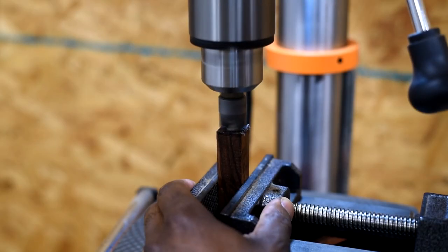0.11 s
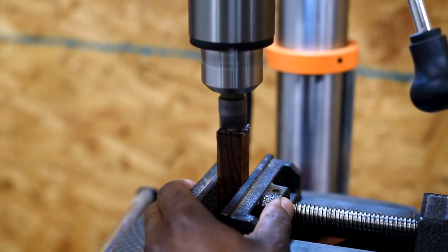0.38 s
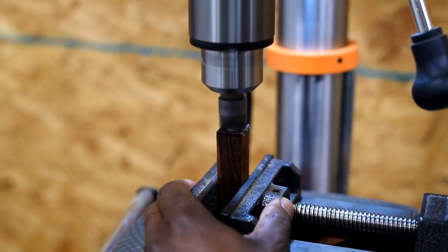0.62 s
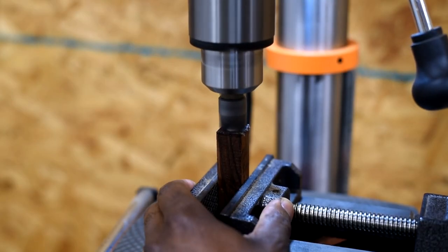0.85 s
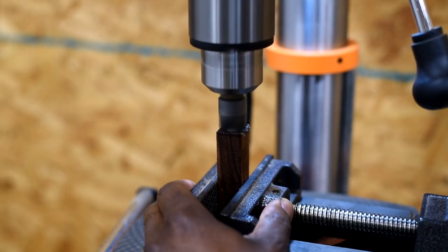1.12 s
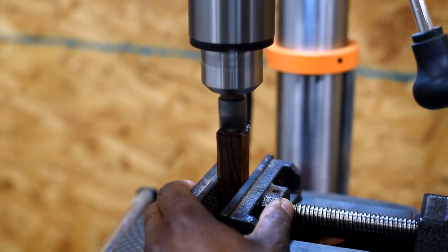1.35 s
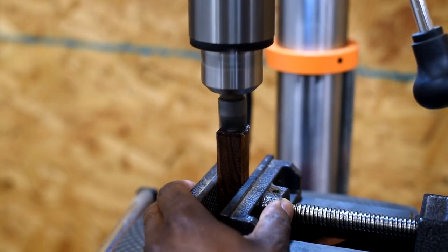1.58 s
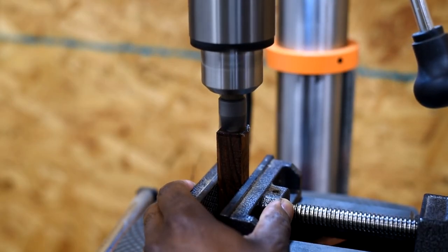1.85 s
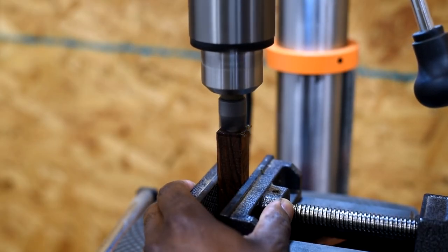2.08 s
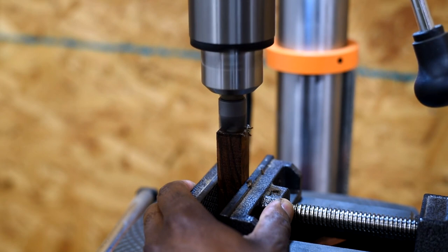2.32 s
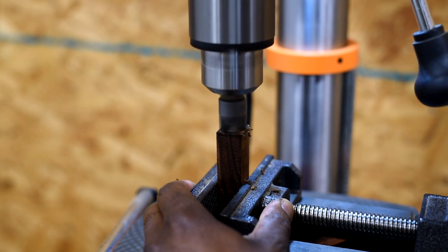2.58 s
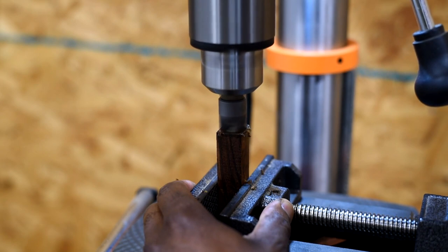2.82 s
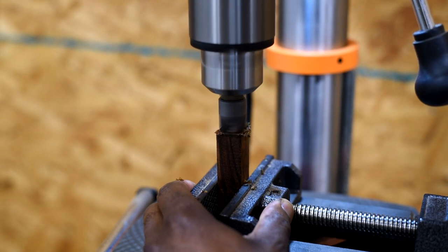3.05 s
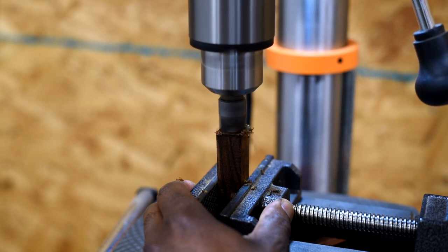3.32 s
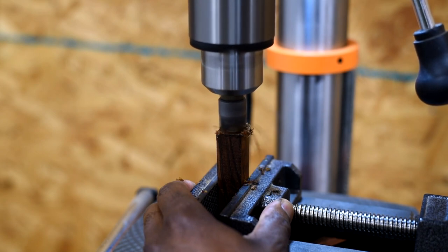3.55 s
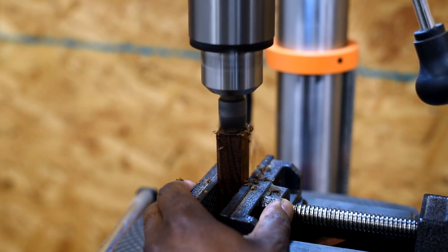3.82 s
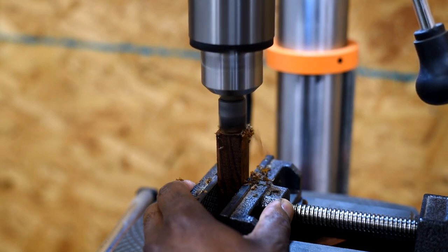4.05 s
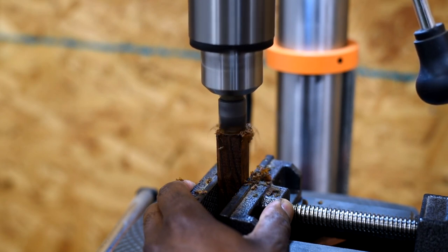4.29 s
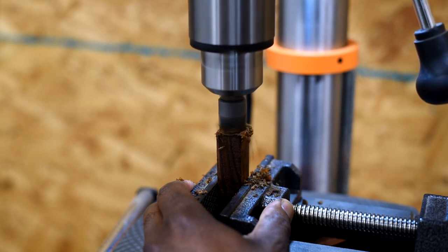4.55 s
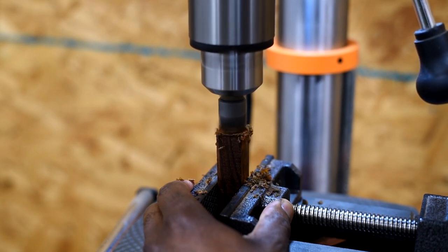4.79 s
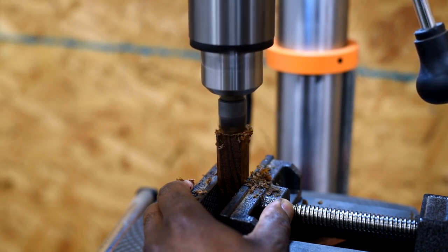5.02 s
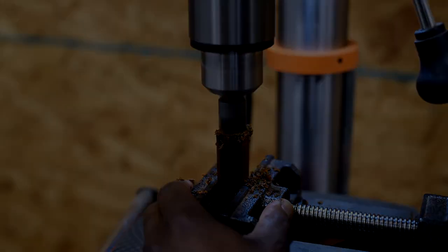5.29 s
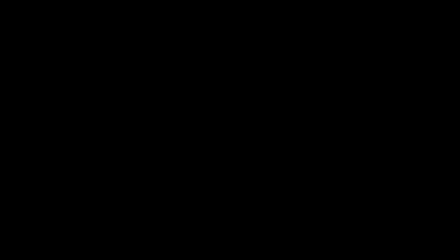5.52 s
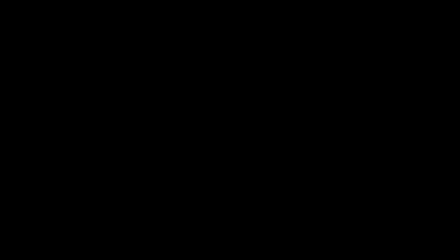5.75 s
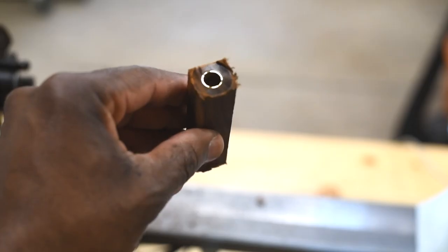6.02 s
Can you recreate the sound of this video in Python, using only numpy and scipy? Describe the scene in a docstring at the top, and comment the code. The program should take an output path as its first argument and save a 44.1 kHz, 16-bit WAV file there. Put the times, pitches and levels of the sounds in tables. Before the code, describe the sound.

Steady motor hum and gear-like whine, with rhythmic wood scraping and steel hiss building as a drill bores deeper, fading out before a quiet workshop.

```python
"""Workshop: a benchtop drill press turns a four-edged cutter into the end of a wooden blank held in a vice.
Sine tones make the hum and whine of the induction motor, the spindle and the column.
Noise shaped by resonances makes head rumble, belt hiss, scrape, steel ring and dust, the cutting pulsed by each edge.
Fibres snag and the quill knocks. The press fades out; after a silence the quiet workshop is heard."""
import sys
import numpy as np
from scipy import signal
from scipy.fft import rfft, irfft, next_fast_len
from scipy.io import wavfile

SR = 44100
rng = np.random.default_rng(int(sys.argv[2]) if len(sys.argv) > 2 else 0)


def boost_factor(decibels):
    """Convert a level in decibels to a linear amplitude factor."""
    exponent = np.asarray(decibels, float) / 20
    return 10 ** exponent


def put_to_file(sound):
    """Save the sound as 16-bit audio at rate SR, in the file named by the first command-line argument."""
    columns = np.atleast_2d(sound).T  # one column per channel
    safe = np.clip(columns, -1, 1)
    whole_steps = np.round(safe * 32767)
    wavfile.write(sys.argv[1], SR, whole_steps.astype(np.int16))


N = 270553
HUM_HZ = 120   # twice the mains frequency

# resonances of head and column: mode_hz, width_hz, gain_db
CASTING = [(177.4, 22, 1), (361, 56, 4.5), (382, 11, 4), (465.8, 21.4, 10), (494, 22, 3.5), (552.6, 30, 8),
           (1154, 58, 9), (1450, 31, 0.5), (1624, 50, 8), (1743, 18, 13.5), (1830, 36, 2.5),
           (1810, 50, -1.5), (1933, 59, 11.5)]
# dips between the casting resonances: dip_hz, width_hz, gain_db
HOLLOWS = [(205, 14, -5), (257, 17, -9), (407, 35, -2), (802, 26, -3), (980, 52, -2.5), (1055, 18, -1),
           (1550, 31, -2.5), (1645, 23, -8), (1893, 46, -7.5)]
# spectrum of the wood scrape: freq_hz, relative_db (per Hz)
SCRAPE = [(710, -40.5), (1200, -2.5), (1410, -7.5), (1770, 1.5), (2190, -10), (3880, 0.5), (5850, -14.5),
          (6500, -10.5), (8450, -42), (14300, -120)]
# resonances of blank and vice: mode_hz, width_hz, gain_db
BLANK = [(2807, 120, -2.5), (3690, 150, -1.5), (3970, 80, -6), (4540, 140, 1)]
# spectrum of chips and dust: freq_hz, relative_db (per Hz)
DUST = [(3500, -26.5), (5500, 2.5), (9000, -14.5), (10000, 1.5), (12900, -2.5), (14000, -8.5), (17000, -10)]


def in_time(rows):
    """Columns of a curve table, one value a sample."""
    s, *columns = np.transpose(rows)
    return [np.interp(np.arange(N) / SR, s, c) for c in columns]


def ramp(from_s, to_s):
    """0 before, 1 after, straight between."""
    return np.clip((np.arange(N) / SR - from_s) / (to_s - from_s), 0, 1)


def between(idle, loaded, load, power=1):
    """A level that moves from its idle to its loaded value."""
    return idle + (loaded - idle) * load ** power


def rms_one(x):
    """Scale to unit rms."""
    return x / np.sqrt(np.mean(x ** 2) + 1e-20)


def drift(rate_hz):
    """Slow chance of spread 1: noise twice through a one-pole low-pass, at 1/40 of the sample rate."""
    r = np.exp(-2 * np.pi * rate_hz * 40 / SR)
    noise = rng.standard_normal(N // 40 + 2002)
    slow = signal.lfilter([1], [1, -2 * r, r * r], noise)[2000:]   # settled part
    return np.interp(np.arange(N) / 40, np.arange(len(slow)), rms_one(slow))


def colour(x, spectrum, modes=()):
    """Shape by a smooth spectrum with resonances or dips on it; rms 1."""
    size = next_fast_len(N)
    hz = np.arange(size // 2 + 1) * SR / size + 1e-3
    point_hz, point_db = np.transpose(spectrum)
    gain = boost_factor(np.interp(np.log(hz), np.log(point_hz), point_db, left=-90, right=-90))
    for mode_hz, width_hz, db in modes:
        gain = gain * (1 + (boost_factor(db) - 1) / (1 + (2 * (hz - mode_hz) / width_hz) ** 2))
    return rms_one(irfft(rfft(x, size) * gain, size)[:N])


def tone(cycles, db, waver_db, rate_hz):
    """A sine of the given rms level whose strength wavers."""
    level = np.sqrt(2) * boost_factor(db + waver_db * drift(rate_hz))
    return level * np.sin(2 * np.pi * (cycles + rng.random()))


def motor(rotor_turns, whine_db):
    """Magnetic hum, rotor bars passing the stator slots, and the cooling fan's blade rate."""
    # mains hum: multiple (of HUM_HZ), level_db (rms)
    hum_table = [(2, -51.5), (3, -40.5), (4, -45.5), (5, -48.5), (6, -50.5), (8, -53), (9, -52)]
    # slot whine family: hum_multiple (added to the slot rate), level_db (against the main whine)
    slot_table = [(-3, -16), (-2, -15.5), (-1, -15), (0, -17.5), (1, 1.5), (3, -23.5), (4, -17),
                  (4.17, -18.5)]
    rotor_bars = 34
    hum = HUM_HZ * np.arange(N) / SR
    out = sum(tone(k * hum, db, waver_db=1.0, rate_hz=0.65) for k, db in hum_table)
    for k, db in slot_table:
        waver_db = 1.63 + 0.27 * abs(k - 1)
        out += tone(rotor_bars * rotor_turns + k * hum, whine_db + db, waver_db, rate_hz=14.0)
    return out + tone(11.97 * rotor_turns, -43, waver_db=2.5, rate_hz=1.5)   # fan


def spindle_whine(turns, load):
    """A gear-like tone whose speed wobbles once a turn, so higher harmonics spread more."""
    # whine harmonics: harmonic, level_db, load_gain_db (under full load)
    harmonics = [(1, -0.5, 0.5), (2, -9, -8.5), (3, -8.5, -2.5), (5, -25, -1)]
    whine_per_turn = 68.25
    whine_db = between(-39.5, -29.5, load, power=0.45)
    wobble = 0.064 * np.sin(2 * np.pi * turns) + 0.014 * drift(4.6)
    cycles = whine_per_turn * turns + wobble
    return sum(tone(k * cycles, whine_db + db + load_db * load, waver_db=1.46 * min(k, 2), rate_hz=6.3)
               for k, db, load_db in harmonics)


def rumble():
    """Belt and bearings shake the resonant casting: noise of wavering strength."""
    # rumble spectrum: freq_hz, relative_db (per Hz)
    spectrum = [(18, -49.5), (30, -27), (45, -24.5), (60, -24.5), (90, -19.5), (125, -11), (200, -12),
                (265, -10.5), (330, -6.5), (415, -11.5), (560, -6.5), (660, -9), (800, -12), (1000, -15.5),
                (1300, -15.5), (2200, -21.5), (2900, -44.5)]
    shake = rng.standard_normal(N) * boost_factor(1.2 * drift(12.0))
    return boost_factor(-29) * colour(shake, spectrum, CASTING + HOLLOWS)


def whirr():
    """Belt and fan hiss, coloured by the resonances of the belt guard."""
    # hiss spectrum: freq_hz, relative_db (per Hz)
    spectrum = [(900, -37), (1500, -8.5), (1900, -7.5), (2450, -8.5), (2890, -4), (3220, -12),
                (4320, -12.5), (5000, -9.5), (6700, -20), (8500, -10.5), (14000, -19.5), (17000, -24.5)]
    # belt guard resonances: mode_hz, width_hz, gain_db
    guard = [(2845, 89, 3.5), (3350, 130, 1), (4370, 120, 4.5), (7150, 200, 4.5)]
    level_db = -34.5 + 1.6 * drift(10.5)
    return boost_factor(level_db) * colour(rng.standard_normal(N), spectrum, guard + HOLLOWS)


def column_tones(turns, load):
    """Spindle orders and hum sidebands beat in the column."""
    # weaker tones: spindle_multiple, hum_multiple, level_db (rms)
    throb_table = [(5.8, 0, -62), (6.7, 0, -61), (3.003, 1, -50.5), (20.1, 0, -63), (21.96, 0, -54.5)]
    # strongest tones: spindle_multiple, hum_multiple
    sway_table = [(8, 0), (12, 0), (-1, 1), (0, 1), (1, 1), (16, 0)]
    # level of each strongest tone: idle_db, loaded_db, swell_middle_s, swell_half_length_s, swell_gain_db
    sway_levels = [(-64, -51, 1.75, .3, 11), (-62, -53.5, 2.25, 0.38, 13.5), (-53.5, -50, 4.8, .5, 2),
                   (-43, -50.5, 1.8, .6, 5), (-43.5, -35.5, 1.07, .5, 7.5), (-54, -47, 2.1, .9, 12.5)]
    s = np.arange(N) / SR
    hum = HUM_HZ * s
    out = sum(tone(k * turns + m * hum, db, waver_db=6.5, rate_hz=2.7) for k, m, db in throb_table)
    for (k, m), (idle_db, loaded_db, middle_s, half_s, gain_db) in zip(sway_table, sway_levels):
        swell_db = gain_db * np.exp(-((s - middle_s) / half_s) ** 2)
        db = between(idle_db, loaded_db, load, power=0.53) + swell_db
        out += tone(k * turns + m * hum, db, waver_db=1.8, rate_hz=6.8)
    return out


def bites(turns, load, uneven):
    """Level swing (dB) as four uneven edges bite once each per turn."""
    # bite of each cutting edge at full unevenness: bite_db
    edges_db = np.array([2, -6.5, 4, -2])
    # edge 2, opposite edge 0, bites harder deep in the hole
    opposite_db = between(-8, 4, ramp(3.6, 4.1))
    # bites come early in the turn until the cutter is seated
    turns = turns + 0.22 * (1 - ramp(1.4, 1.7))
    passes = 4 * turns + .5
    edge = np.floor(passes).astype(int)
    chance_db = 1.0 * rng.standard_normal(256)[edge % 256]
    edge_db = edges_db[edge % 4] + opposite_db * (edge % 4 == 2)
    # rise and fall inside one bite, longer under load
    half_passes = .27 + 0.14 * load ** 2
    swell = np.exp(-((passes - edge - .5) / half_passes) ** 2)
    runout_db = 4.4 * np.cos(2 * np.pi * turns)   # the cutter runs slightly off centre
    return np.clip(uneven, 0, 2) * (swell * (10.5 + edge_db + chance_db) + runout_db)


def grains():
    """Noise whose samples vary widely in strength, as torn grains do."""
    return boost_factor(2.5 * np.minimum(rng.exponential(1, N), 5)) * rng.standard_normal(N)


def chatter(modes, bite_db):
    """Stick-slip makes single modes squeak in short bursts that wander in pitch; rms 1."""
    out = np.zeros(N)
    for hz, width_hz, db in modes:
        cycles = np.cumsum(hz + .7 * width_hz * drift(30.0)) / SR
        burst_db = 13.0 * np.tanh(0.64 * drift(55.0) - .4)
        out += tone(cycles, db + bite_db + burst_db, waver_db=0.5, rate_hz=1)
    return rms_one(out)


def wood_scrape(bite_db, load):
    """Edges tear wood fibres, and the grains ring in blank and vice."""
    level_db = between(-39.5, -31, load, power=0.54)
    pulsed = grains() * boost_factor(0.32 * bite_db + 1.6 * drift(18.0))
    scrape = colour(pulsed, SCRAPE, BLANK + HOLLOWS)
    return boost_factor(level_db) * (scrape + boost_factor(-7) * chatter(BLANK[:-1], 0.3 * bite_db))


def steel_ring(bite_db, ring_db):
    """Steel rubbing in the hole rings the cutter's own modes."""
    # ring spectrum: freq_hz, relative_db (per Hz)
    spectrum = [(5000, -37), (5900, -24), (6300, -9.5), (7100, 2), (8300, -4), (8900, -1.5), (9600, -5),
                (10500, -17.5), (12000, -39.5)]
    # cutter resonances: mode_hz, width_hz, gain_db
    cutter = [(6590, 80, 2.8), (7030, 470, 3.5), (7800, 290, 5), (8610, 230, 5.7), (9200, 99, 2.3),
              (10250, 210, 1.1)]
    pulsed = grains() * boost_factor(bite_db + .6 * drift(8.0))
    return boost_factor(ring_db) * (colour(pulsed, spectrum, cutter) + boost_factor(-4) * chatter(cutter[:-1], bite_db))


def dust_hiss(bite_db, ring_db, load):
    """Chips and dust hiss, following part of the ring's swing and the load."""
    level_db = -43 + 0.67 * (ring_db + 37.5) + 4 * load
    pulsed = grains() * boost_factor(0.43 * bite_db + 1.4 * drift(22.0))
    return boost_factor(level_db) * colour(pulsed, DUST)


def snags():
    """Fibres catch and tear: scrape and dust noise with a sudden start and a short decay."""
    # catches: start_s, level_db (before the 13 dB cut)
    catches = [(0.2894, -13.5), (0.9956, -21.5), (1.0894, -16.5), (1.2027, -19.5), (1.3494, -20),
               (1.8148, -16.5), (1.9344, -17), (1.9894, -17.5), (2.2394, -17), (2.3241, -15),
               (2.4438, -13.5), (2.7955, -18), (2.9981, -16), (3.6854, -15.5), (3.923, -14),
               (4.2792, -13.5), (4.3094, -13.5), (4.5774, -16.5), (4.9811, -15)]
    start_s, level_db = np.transpose(catches)
    decay_s = 0.021
    clicks = np.full(N, 1e-18)
    clicks[np.round(start_s * SR).astype(int)] = boost_factor(level_db - 13.0)
    envelope = signal.lfilter([1], [1, -np.exp(-1 / (decay_s * SR))], clicks)
    wood = colour(rng.standard_normal(N), SCRAPE, BLANK)
    dust = colour(rng.standard_normal(N), DUST)
    return envelope * (wood + boost_factor(-6.5) * dust)


def walls(x):
    """Nearby bench and walls return a short dense tail."""
    echo_db, t60_s = -12, .12
    s = np.arange(SR // 5) / SR
    tail = rng.standard_normal(len(s)) * boost_factor(-60 * s / t60_s) * (s > .002)
    tail /= np.sqrt(np.sum(tail ** 2))
    return x + boost_factor(echo_db) * signal.fftconvolve(x, tail)[:N]


def knocks():
    """Play in the quill: each dull knock rings every casting mode with a strength of its own."""
    # knocks: start_s, level_db (before the mode's own level)
    knock_table = [(2.413, -13), (3.479, -16), (3.751, -15), (4.306, -12.5)]
    start_s, level_db = np.transpose(knock_table)
    at = np.round(start_s * SR).astype(int)
    out = np.zeros(N)
    for hz, width_hz, db in CASTING:
        strength_db = rng.normal(0, 2.5, len(at))
        dull_db = -19.5 - 6.0 * abs(np.log2(hz / 470))   # 6 dB per octave away from 470 Hz
        clicks = np.full(N, 1e-18)
        clicks[at] = np.sign(strength_db) * boost_factor(level_db + db + strength_db + dull_db)   # random polarity
        r, w = np.exp(-np.pi * width_hz / SR), 2 * np.pi * hz / SR
        out += signal.lfilter([0, np.sin(w)], [1, -2 * r * np.cos(w), r * r], clicks)
    return out


def quiet_workshop():
    """Steady low-weighted room noise."""
    # room spectrum: freq_hz, relative_db (per Hz)
    spectrum = [(18, -41.5), (30, -17), (123, -2), (219, -11), (308, -5.5), (600, -13.5), (1440, -20),
                (1970, -24), (17000, -30)]
    return boost_factor(-61.5) * colour(rng.standard_normal(N), spectrum)


def scene():
    """Feed pressure slows rotor and spindle; the press fades out, and the workshop follows a silence."""
    # feed pressure: time_s, load (0-1)
    load_curve = [(0, 0), (.9, .1), (1.4, .35), (2.0, .6), (3.0, .72), (3.8, 1.0), (5.3, .95), (5.6, .5)]
    # cutting: time_s, ring_db (steel rubbing in the hole), unevenness (of the edges, 0-1)
    cut_curve = [(0, -47, 0.3), (.8, -43, .48), (1.05, -38.5, 0.6), (1.55, -37.5, 0.4), (2.05, -35, 0.53),
                 (2.6, -41.5, .9), (3.2, -37.5, 0.5), (3.55, -33, .56), (4.2, -30.5, 0.4),
                 (4.5, -30.5, .38), (5.3, -32, 0.4), (5.56, -42.5, .3)]
    fade_start_s, fade_end_s, workshop_s = 5.226, 5.568, 5.9
    s = np.arange(N) / SR
    load, = in_time(load_curve)
    ring_db, uneven = in_time(cut_curve)
    rotor_hz = 29.71 - .18 * load
    spindle_hz = 8.51 - .09 * load
    rotor_turns = np.cumsum(rotor_hz) / SR
    turns = np.cumsum(spindle_hz) / SR
    turns -= np.interp(2.563, s, turns)   # edge 0 bites at 2.563 s

    press = motor(rotor_turns, whine_db=between(-35, -32, load)) + spindle_whine(turns, load)
    press += rumble() + whirr() + column_tones(turns, load)
    bite_db = bites(turns, load, uneven)
    cutting = wood_scrape(bite_db, load) + steel_ring(bite_db, ring_db)
    cutting += dust_hiss(bite_db, ring_db, load) + snags()
    press += walls(cutting) + knocks()

    fade_out = 1 - ramp(fade_start_s, fade_end_s)
    fade_in = ramp(workshop_s, workshop_s + .008)
    mono = press * fade_out + quiet_workshop() * fade_in
    return np.array([mono, mono])


def band_limit(x):
    """A steep low-pass at the top of the band."""
    return signal.sosfilt(signal.butter(12, 15750, fs=SR, output="sos"), x)


def record(dry):
    """The same mono mix on both channels."""
    return band_limit(dry)


dry = scene()
out = record(dry)
put_to_file(out)
```